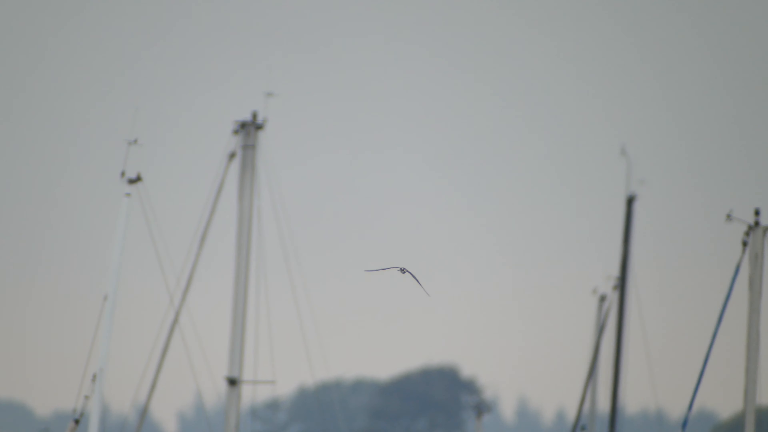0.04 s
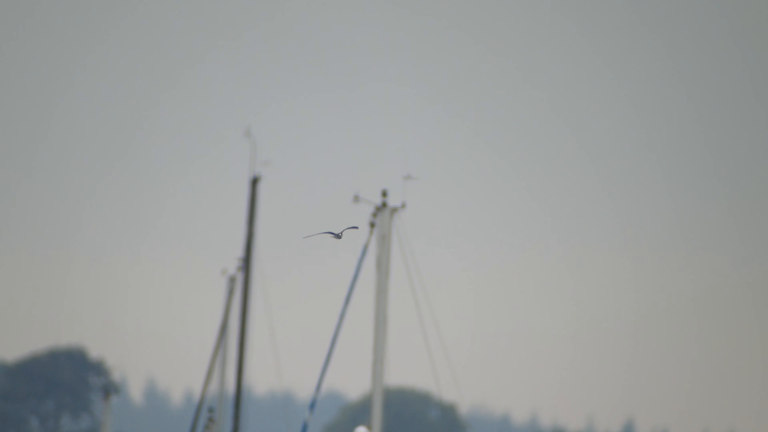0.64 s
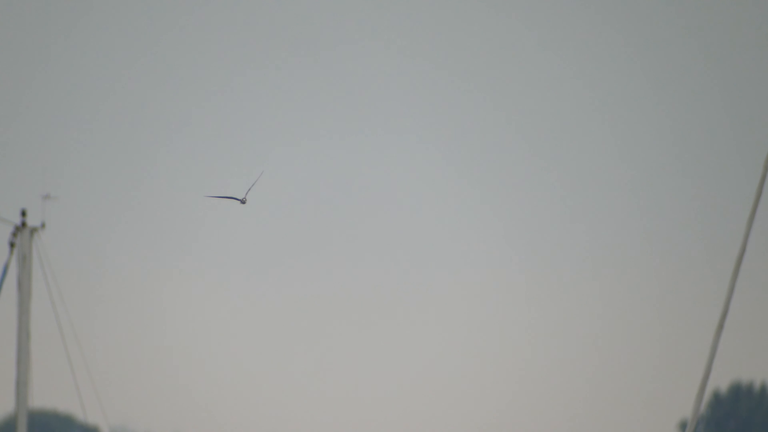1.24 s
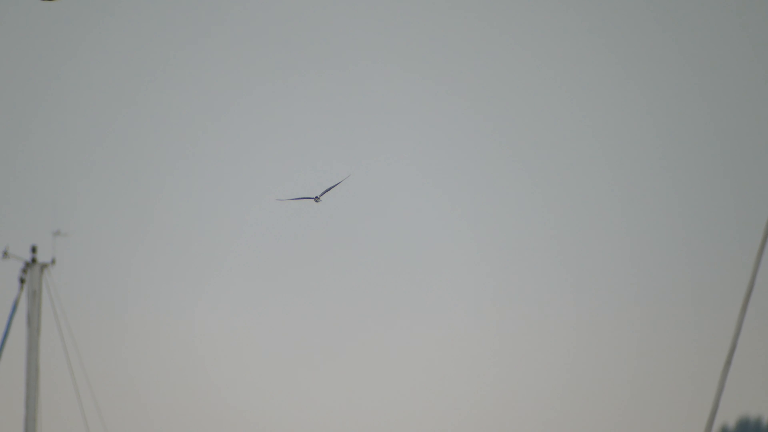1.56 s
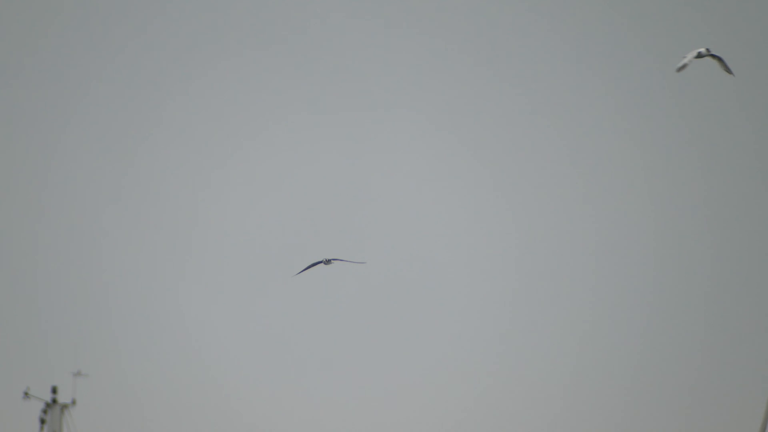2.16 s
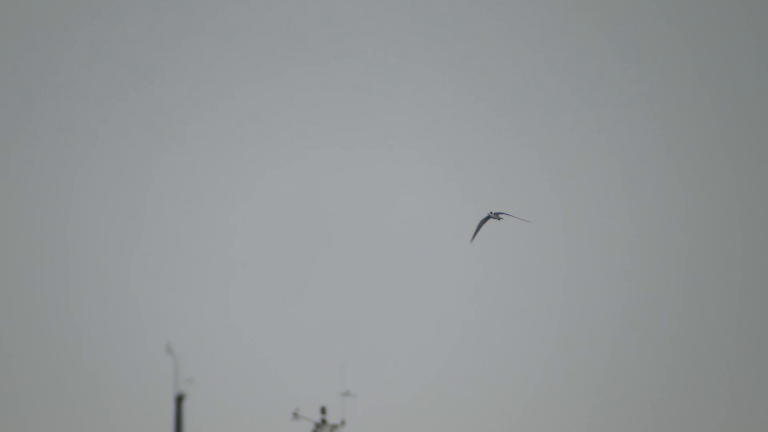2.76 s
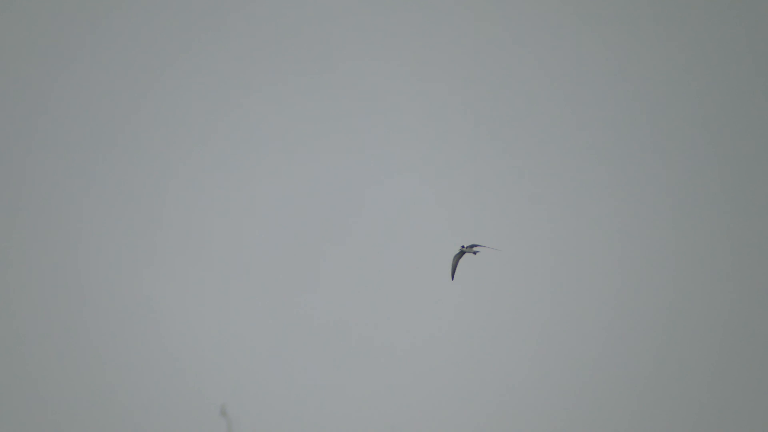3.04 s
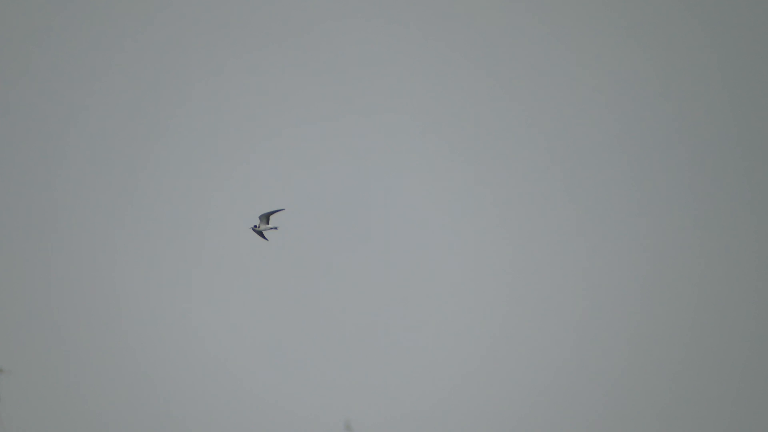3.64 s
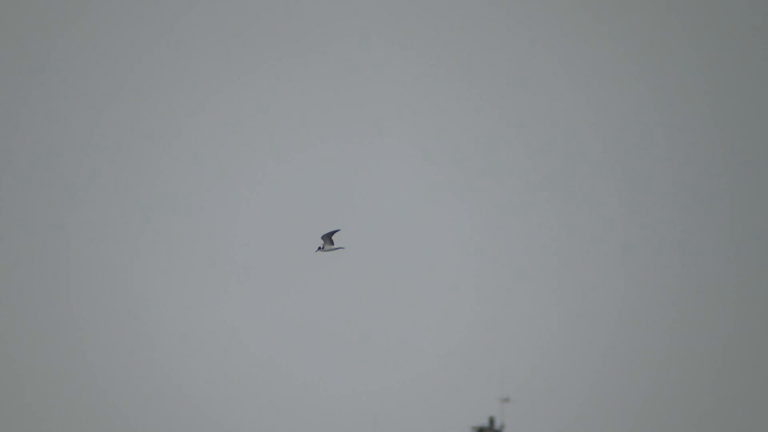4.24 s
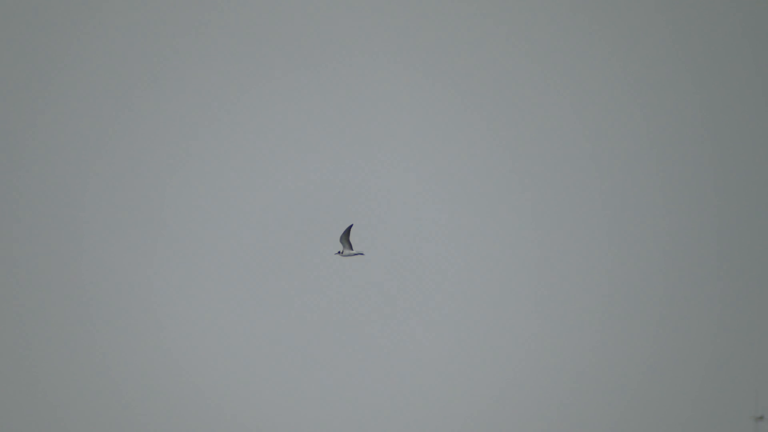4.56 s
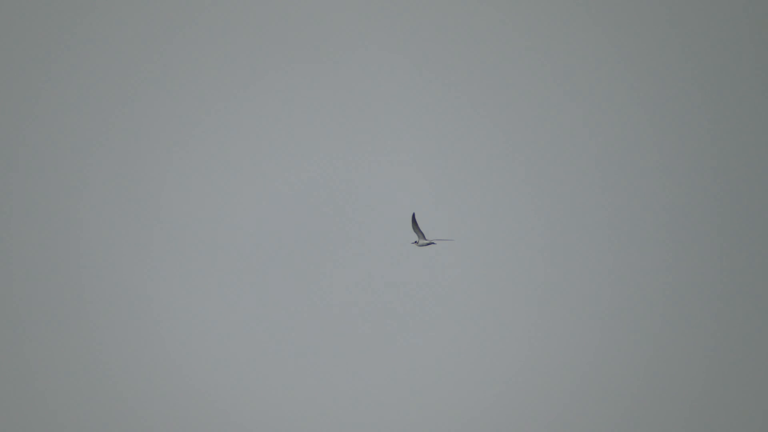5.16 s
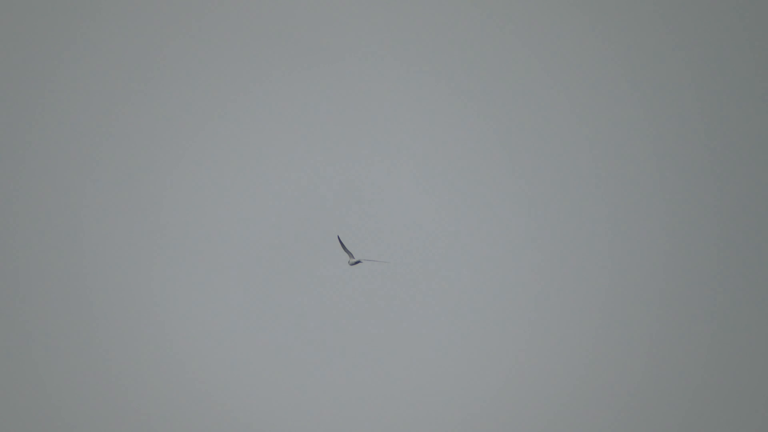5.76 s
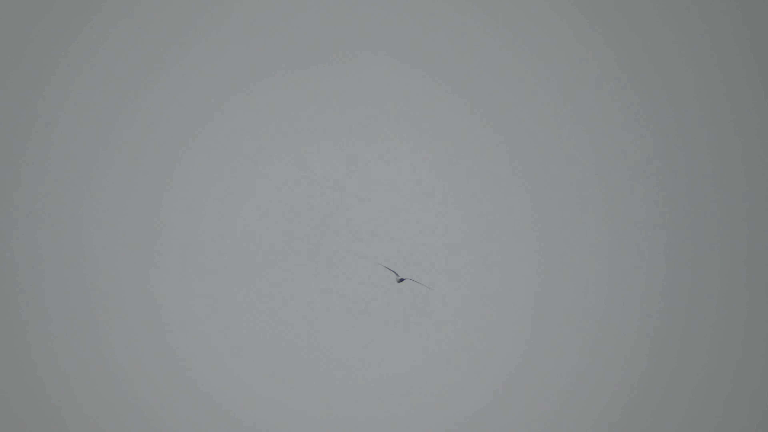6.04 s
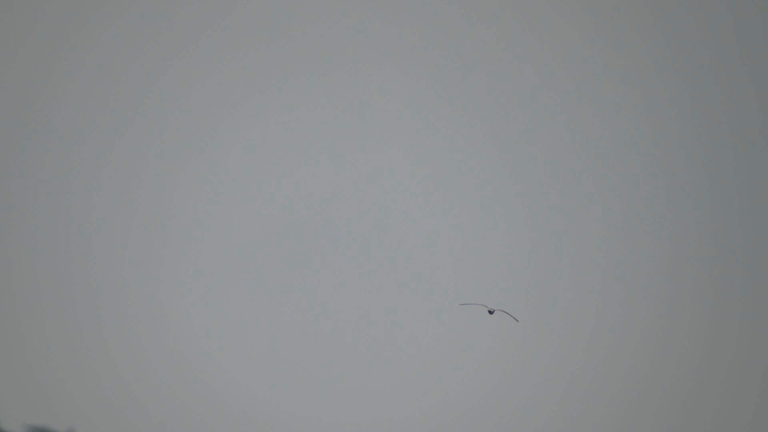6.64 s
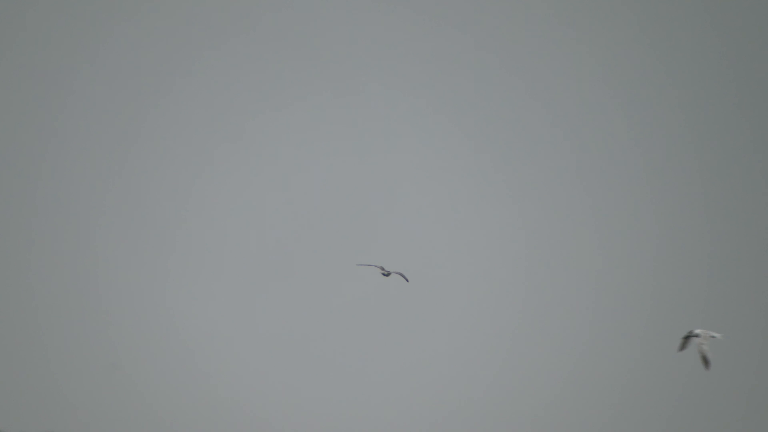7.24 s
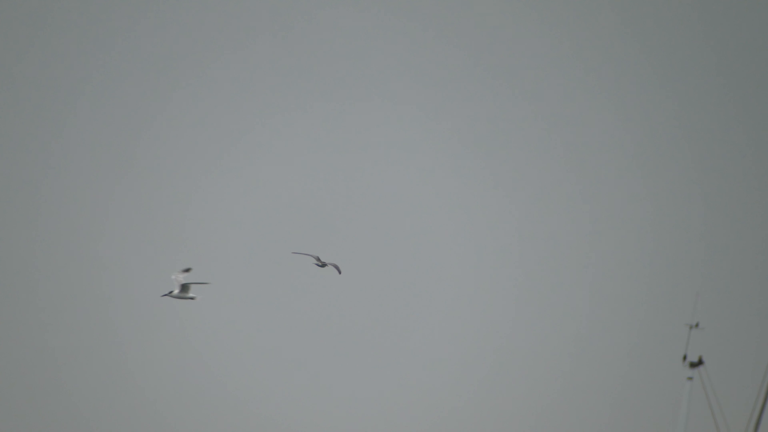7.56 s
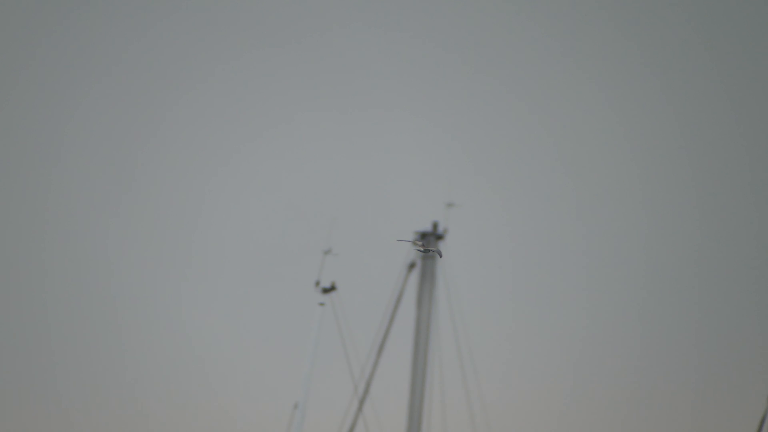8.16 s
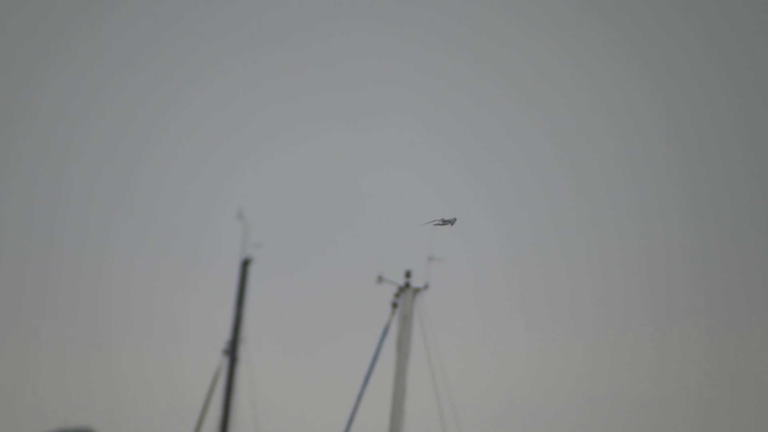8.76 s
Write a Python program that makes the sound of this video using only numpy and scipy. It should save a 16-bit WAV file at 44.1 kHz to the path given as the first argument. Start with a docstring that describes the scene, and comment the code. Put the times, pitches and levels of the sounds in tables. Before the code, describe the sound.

Close to the microphone and slightly left, terns give six rasping squawks, each breaking into a clear arched note, the last two fainter. High whistles and short chirps mix with farther hoarse calls and a faint colony, and carry on after the squawks stop. The calls echo lightly across a calm harbour, where water plops at the hulls over a low rumble.

```python
"""A reedy whistle wavers over the low rumble and engine hum of a quiet marina, where terns are wheeling.
Close to the microphone, a little left, they squawk: a pulsed rasp breaks into a clear arched note and
back. Thin warbles, pips and gritty squeaks overlap them; farther off come keks, rattles, hoarse notes
and a faint colony. Water washes softly and plops at the hulls, and the shore answers the birds."""
import sys
import numpy as np
from scipy import signal
from scipy.fft import rfft, irfft, next_fast_len
from scipy.io import wavfile
from scipy.ndimage import map_coordinates

SR = 44100
rng = np.random.default_rng(int(sys.argv[2]) if len(sys.argv) > 2 else 0)


def inscribe(sig):
    """Save sig as 16-bit PCM at rate SR to the path in sys.argv[1].

    A 1-D sig is mono; a 2-D sig holds one channel per row.
    Samples are clipped to [-1, 1] before scaling.
    """
    pcm = np.round(np.clip(np.atleast_2d(sig).T, -1, 1) * 32767)
    wavfile.write(sys.argv[1], SR, pcm.astype(np.int16))


N = 392490


def amp(db):
    """Decibels to gain."""
    return 10 ** (np.asarray(db) / 20)


def unit(x):
    """Scale to rms 1."""
    return x / np.sqrt(np.mean(x ** 2) + 1e-20)


def along(points, hz):
    """Read (f/Hz, value) points on a log frequency axis."""
    f, v = np.transpose(points)
    return np.interp(np.log(hz + 1), np.log(f + 1), v)


def curves(rows, at):
    """Interpolate the later columns of a table along its first."""
    axis, *columns = np.transpose(rows)
    return [np.interp(at, axis, column) for column in columns]


def wobble(rate, n):
    """A smooth random curve of n samples, rate knots a second."""
    return map_coordinates(rng.standard_normal(1024), [np.arange(n) * rate / SR], mode="wrap")


def filtered(x, response):
    """Filter x by a gain that is a function of frequency."""
    n = x.shape[-1]
    m = next_fast_len(n + SR // 10)
    return irfft(rfft(x, m) * response(np.fft.rfftfreq(m, 1 / SR)), m)[..., :n]


def band_rms(x, lo_hz, hi_hz):
    """Strength of x inside one band."""
    return np.std(filtered(x, lambda hz: (hz > lo_hz) & (hz < hi_hz))) + 1e-12


def clock(length):
    """Sample times of one call."""
    return np.arange(int(max(length, .01) * SR)) / SR


def turns(hz):
    """Running phase of a frequency curve, in radians."""
    return 2 * np.pi * np.cumsum(hz) / SR


def fade(t, rise, fall):
    """Soft start and end of a call."""
    return np.clip(t / rise, 0, 1) * np.clip((t[-1] - t) / fall, 0, 1)


def add(track, s, x):
    """Mix x into the track at time s."""
    part = track[max(int(s * SR), 0):][:len(x)]
    part += x[:len(part)]


def rush(spectrum):
    """Stereo noise of rms 1, reaching the microphone from all around."""
    # likeness of the two channels: f/Hz, left-right correlation
    correlation = [(40, 0.35), (120, 0.2), (200, 0.15), (300, -0.72), (550, -0.71), (1000, -0.35),
                   (2500, 0.39), (8000, 0.204)]

    def mid_side_gains(hz):
        angle = np.arccos(np.clip(along(correlation, hz), -1, 1)) / 2
        return amp(along(spectrum, hz)) * [np.cos(angle), np.sin(angle)]

    mid, side = filtered(rng.standard_normal((2, N)), mid_side_gains)
    return unit(np.array([mid + side, mid - side]))


def harbour_rumble():
    """Steady rumble from across the harbour, under open air that slowly swells and sinks."""
    # spectrum of rumble and air: f/Hz, relative density/dB
    spectrum = [(20, -41), (45, -18.5), (60, -22), (80, -6.5), (115, -7.5), (175, -6.5), (250, -5),
                (400, -7), (1000, -13.5), (1900, -20), (3300, -22), (4600, -19), (6200, -27.5), (9200, -29),
                (11500, -37), (15000, -43)]
    # swell of the open air: t/s, relative level/dB
    air_levels = [(0.0, -68), (2.87, -63), (4.19, -67.5), (6.72, -67), (7.68, -68.5), (8.9, -67.5)]
    air_db, = curves(air_levels, np.arange(N) / SR)
    noise = rush(spectrum)
    low = filtered(noise, lambda hz: 1 / (1 + (hz / 350) ** 4))
    high = noise - low
    rumble = amp(-60.5) * low / band_rms(low, 70, 326)
    air = amp(air_db + 4.5 + .18 * wobble(3.65, N)) * high / band_rms(high, 494, 1020)
    return rumble + air


def engine_hum():
    """Two low engine tones waver in strength and phase, separately in each channel."""
    def drone(hz, drift):
        phase = 2 * np.pi * hz * np.arange(N) / SR
        pair = [wobble(drift, N) * np.sin(phase) + wobble(drift, N) * np.cos(phase) for _ in range(2)]
        return unit(np.array(pair))

    return amp(-63) * drone(hz=198.5, drift=12) + amp(-64) * drone(hz=167.6, drift=24)


def wavers():
    """Reedy whistles whose pitch swings down and up."""
    # whistles: t/s, length/s, f/Hz, swing rate/Hz, level/dB
    calls = [(0.003, 0.15, 4550, 11, -47), (0.14, 0.1, 4750, 19, -51), (0.893, 0.115, 4560, 36, -48.5),
             (0.978, 0.077, 4510, 8.7, -46)]
    out = np.zeros(N)
    for start, length, hz, swing_hz, db in calls:
        t = clock(length)
        n = len(t)
        swing = .0318 * np.cos(2 * np.pi * swing_hz * t)
        phase = turns(hz * (1 - swing + .012 * wobble(110, n) + .026 * wobble(1400, n)))
        tone = unit(np.sin(phase) + amp(-19.5) * np.sin(2 * phase))
        add(out, start, amp(db + 2.6 * wobble(118, n)) * fade(t, .013, .015) * tone)
    return out


def shore(x):
    """Boats and shore scatter the calls back, mostly from ahead; the treble dies first."""
    # decay of the echo: f/Hz, time to fall 60 dB/s
    decay = [(500, 0.79), (2500, 0.42), (5000, 0.35), (10000, 0.077)]
    hz, t, noise = signal.stft(rng.standard_normal((2, SR)), SR, nperseg=256)
    mid, side = signal.istft(noise * amp(-60 * t / along(decay, hz)[:, None]), SR, nperseg=256)[1]
    tail = mid + amp(-1.5) * np.array([side, -side])
    return signal.fftconvolve(x[None], tail / np.linalg.norm(tail[0]), axes=1)[:, :N]


def hoarse(glide_hz, flutter):
    """A note on a pitch curve; flutter roughens the pitch and makes the level beat."""
    n = len(glide_hz)
    phase = turns(glide_hz * (1 + .07 * flutter * wobble(900, n)))
    beats = amp(6.7 * flutter * np.sin(turns(58 * (1 + .46 * wobble(66, n)))))
    tone = np.sin(phase) + amp(-19) * np.sin(2 * phase)
    return fade(np.arange(n) / SR, .028, .025) * unit(beats * tone)


def colony(count=44, registers_hz=(2446, 4840)):
    """Faint arched calls of many birds a long way off."""
    out = np.zeros(N)
    for i, (when, tune, span, size, flutter) in enumerate(rng.random((count, 5))):
        t = clock(.06 + .12 * span)
        glide_hz = registers_hz[i % 2] * (.84 + .2 * tune + .1 * np.sin(2.4 * t / t[-1]))
        call = amp(-68.5 + 8 * (size - .5)) * hoarse(glide_hz, .2 + .6 * flutter)
        add(out, (i + when) / count * N / SR, call)
    return out


def lapping(count=60):
    """Small bubbles plop faintly as ripples meet the hulls."""
    out, t = np.zeros((2, N)), clock(.11)
    for when, (tune, size, side) in zip(rng.uniform(0, N / SR, count), rng.standard_normal((count, 3))):
        rising_hz = 640 * np.exp(.2 * tune) * (1 + .5 * t)
        ring = np.sin(turns(rising_hz)) * np.exp(-t / .018) * fade(t, .008, .02)
        for channel, weight in zip(out, (np.cos(side), np.sin(side + 1))):
            add(channel, when, amp(-61 + 2 * size) * weight * ring)
    return out


def rasp(pitch, rough, beat_hz, depth_db):
    """A chaotic syrinx: harmonics of an unsteady pitch flicker, and all burst and chirp in quick beats."""
    n = len(pitch)
    cycle = turns(beat_hz * (1 + .24 * wobble(110, n))) - 2.4
    beat = np.tanh(1.5 * np.cos(cycle))
    jitter = .04 * rough * wobble(1100, n) + .018 * wobble(110, n)
    phase = turns(pitch * (1 + jitter + .035 * rough * np.sin(cycle)))
    tone = np.zeros(n)
    for k in range(1, 9):
        flicker = 1 + .85 * rough * (wobble(750, n) + 1j * wobble(750, n))
        swell_db = depth_db * beat * min(k / 3, 1) + 2.3 * wobble(110, n)  # upper harmonics beat deeper
        tone += np.real(flicker * np.exp(1j * (k * phase + k * k))) * amp(swell_db)
    breath = rng.standard_normal(SR)[:n] * amp(depth_db * beat)
    return unit(tone) + .3 * rough * unit(breath)


def throat_and_bill(voice, t, focus_hz, closing):
    """The wide-open bill stresses a high resonance, narrows to stress focus_hz, then closes."""
    # throat response, bill open: f/Hz, gain/dB
    open_throat = [(900, -16), (1350, 0.5), (2000, 3), (2700, 0.5), (3300, 7), (4000, 2.5), (4900, 6.5),
                   (5800, -1.5), (7000, -3.5), (8500, -8.5), (10000, -17), (12000, -39)]
    # throat response, bill closing: f/Hz, gain/dB
    closing_throat = [(900, -34), (1300, -1), (2000, 6), (2550, 1), (3100, 5.5), (3800, 9.5), (4500, -1.5),
                      (5200, 2), (5900, 1), (6600, 0), (8000, -8.5), (10000, -10), (12000, -47)]

    def stressed(centre_hz, db):
        peak_db = lambda hz: db * np.exp(-((hz - centre_hz) / 480) ** 2)
        return unit(filtered(voice, lambda hz: amp(along(open_throat, hz) + peak_db(hz))))

    gape = np.exp(-(t / .066) ** 2)
    open_voice = gape * stressed(4160, db=9) + (1 - gape) * stressed(focus_hz, db=6.5)
    closing_voice = filtered(voice, lambda hz: amp(along(closing_throat, hz)))
    return (1 - closing) * unit(open_voice) + closing * unit(closing_voice)


def clear_note(from_crest, crest_hz, note_db, octave_db):
    """The arched note in a squawk starts on its fundamental; the octave swells on the way down."""
    n = len(from_crest)
    arch = .85 + .15 * np.exp(-(from_crest / np.where(from_crest < 0, .05, .04)) ** 2)
    phase = turns(crest_hz * arch * (1 + .017 * wobble(900, n) + .008 * wobble(150, n)))
    fundamental = amp(note_db) * np.exp(-((from_crest + .016) / .063) ** 6) * np.sin(phase)
    swell = np.exp(-((from_crest - .022) / .021) ** 2) + .5 * np.exp(-((from_crest + .0027) / .085) ** 4)
    overtones = np.sin(2 * phase) + amp(-11.5) * np.sin(3 * phase) + amp(-25.5) * np.sin(4 * phase)
    return np.sqrt(2) * (fundamental + amp(octave_db) * swell * overtones) * amp(2 * wobble(170, n))


def squawks(lead_in_s=.19, near_db=-47):
    """A rasp scoops up, tires, yields to a clear note and returns; gives the calls and the shore's feed."""
    # squawks: start t/s, crest t/s, crest f/Hz, rasp f/Hz, opening level/dB, closing level/dB,
    # closing length/s, brightness/dB, lead-in level/dB, note level/dB, octave level/dB,
    # stressed resonance f/Hz, roughness/0-1, beat depth/dB
    calls = [(0.237, 0.509, 2554, 1351, -45, -45, 0.11, 1, -68, -50.5, -40, 4460, 0.68, 3),
             (1.319, 1.597, 2641, 1379, -43, -45, 0.16, 1.5, -50, -39, -40, 3780, 0.47, -1.5),
             (2.36, 2.639, 2566, 1346, -41, -43.5, 0.16, -0.5, -56, -40.5, -38, 4260, 0.69, 4.5),
             (3.468, 3.765, 2594, 1387, -44.5, -46.5, 0.16, -4, -56, -42.5, -44.5, 2600, 0.69, 5),
             (4.966, 5.241, 2516, 1279, -54, -53, 0.11, -3, -58.5, -49.5, -55.5, 2690, 0.61, -1),
             (6.381, 6.649, 2500, 1297, -49.5, -56, 0.14, -11.5, -48.5, -49.5, -45, 3700, 0.66, 7)]
    out, to_shore = np.zeros((2, N))
    for (start, crest, crest_hz, rasp_hz, open_db, close_db, closing_s, bright_db,
         lead_db, note_db, octave_db, focus_hz, roughness, beat_db) in calls:
        t = clock(crest + closing_s - start)
        from_crest = start + t - crest
        after = np.maximum(from_crest, 0)  # as the bill shuts, pitch and treble sink
        closing = np.clip(from_crest / .0377, 0, 1)
        opening_db = open_db - 14 * np.exp(-t / .0076) - 19.5 * t  # bursts out, then tires
        yield_db = 9 * np.exp(-((from_crest + .015) / .04) ** 2)
        level_db = (1 - closing) * opening_db + closing * close_db - yield_db
        scoop = 1 + .24 * np.exp(-t / .035) - .31 * np.exp(-t / .012)
        pitch = (1 - closing) * rasp_hz * scoop + closing * 1304 * (1 - .118 * after)
        rough = roughness + .25 * np.exp(-t / .07) + .08 * closing
        beat_hz = 76 + 6 * np.exp(-t / .08) + 8 * closing
        depth_db = beat_db + 8 * np.exp(-t / .022) + 24 * after  # the first beats stand apart
        voice = throat_and_bill(rasp(pitch, rough, beat_hz, depth_db), t, focus_hz, closing)
        high = filtered(voice, lambda hz: 1 - 1 / (1 + (hz / 5500) ** 16))
        low = voice - high
        body = amp(1.5) * low / band_rms(low, 2930, 5630)
        treble_db = bright_db - 5.5 - 7 * np.exp(-t / .004) - 60 * after
        treble = amp(treble_db) * high / band_rms(high, 5500, 6930)
        note = clear_note(from_crest, crest_hz, note_db, octave_db)
        call = fade(t, .004, .055) * (amp(level_db) * (body + treble) + note)
        lead_hz = np.full(len(clock(lead_in_s)), .91 * crest_hz)
        add(call, crest - lead_in_s - start, amp(lead_db) * hoarse(lead_hz, flutter=.97))
        add(out, start, call)
        echo_db = -5 + .3 * (near_db - open_db)  # fainter birds are farther off and wetter
        add(to_shore, start, amp(echo_db) * call)
    return out, to_shore


def whistles():
    """A nearly pure tone slides up, warbles unevenly in upward flicks, holds and drops away."""
    # whistles: t/s, length/s, f/Hz, relative level/dB
    calls = [(0.494, 0.13, 4470, -51.5), (0.643, 0.15, 4565, -55.5), (0.738, 0.12, 4593, -51.5),
             (1.677, 0.19, 4440, -45), (1.883, 0.17, 4883, -55), (2.129, 0.19, 4435, -46.5),
             (2.185, 0.18, 4870, -56), (2.884, 0.19, 4460, -49.5), (3.341, .19, 4584, -47),
             (3.743, 0.11, 4650, -55), (3.965, 0.13, 4630, -54), (4.195, 0.12, 4577, -52),
             (3.17, 0.15, 4875, -66.5), (5.785, 0.13, 4746, -58.5), (6.001, 0.14, 4820, -52),
             (6.895, .168, 5157, -54), (7.323, 0.19, 5103, -53.5), (7.732, 0.18, 5080, -54)]
    # shape by pitch: f/Hz, late swell/dB, octave level/dB
    shapes = [(4400, 0.5, -21.5), (4790, 5.5, -13), (4990, 3.5, -30)]
    # width of the warble: f/Hz, share of pitch
    warbles = [(4420, .045), (4560, .09), (4750, .14), (4880, .17), (5100, .135)]
    # final fall: f/Hz, share of pitch
    drops = [(4450, .02), (4750, .05), (4900, .13), (5100, .15)]
    out = np.zeros(N)
    for start, length, hz, db in calls:
        t = clock(length)
        progress, n = t / t[-1], len(t)
        swell_db, octave_db = curves(shapes, hz)
        # low whistles start to warble later and shake less regularly
        begins = np.interp(hz, [4500, 4900], [.28, .06])
        uneven = np.interp(hz, [4500, 4900], [.35, .1])
        warbling = np.interp(progress, [begins - .04, begins + .1, .55, .63], [0, 1, 1, 0])
        width = warbling * along(warbles, hz) * min(length / .12, 1) ** 2
        cycle = turns(48 * (1 + uneven * wobble(60, n)))
        flick = np.abs(np.sin(cycle / 2)) ** 3 * (1 + uneven * wobble(50, n))
        shake = width * (flick - .17)
        rise = 1 - .085 * np.exp(-t / .018) + .008 * np.exp(-((progress - .28) / .17) ** 2)
        drop = along(drops, hz) * np.exp((t - t[-1]) / .014)
        wander = .02 * uneven * (wobble(40, n) + wobble(200, n))
        grit = (.001 + .02 * uneven + .4 * uneven * width) * wobble(1400, n)
        phase = turns(hz * (rise - drop + shake + wander + grit))
        level_db = db + swell_db * np.interp(progress, [.55, .66], [-.4, .6]) - 4 * progress ** 14
        level_db += 1.95 * wobble(130.6, n) - 40 * shake  # thins at the top of each shake
        octave = amp(octave_db + 1.17 * wobble(37.3, n)) * np.sin(2 * phase)
        tone = np.sin(phase) + octave + amp(-58) * np.sin(3 * phase)
        tremor = unit(filtered(rng.standard_normal(SR)[:n], lambda f: 1 / (1 + (f / 2300) ** 4)))
        call = 3.64 * amp(level_db) * tone * (1 + amp(-18) * warbling * tremor) * fade(t, .005, .006)
        add(out, start, call)
        # a glancing echo off the water beats against the moving pitch
        add(out, start + rng.uniform(.004, .014), .33 * call)
    return out


def keks():
    """Short, slightly falling rasps from birds farther off."""
    # keks: t/s, length/s, f/Hz, relative level/dB
    calls = [(0.885, 0.094, 1590, -60), (1.193, 0.079, 1617, -59.5), (4.407, 0.063, 1560, -67),
             (4.425, 0.13, 1337, -58.5), (4.835, 0.063, 1483, -58), (6.327, 0.074, 1585, -56),
             (7.209, 0.096, 1583, -54.5)]
    # throat response: f/Hz, gain/dB
    throat = [(900, -22), (1500, -3.5), (2300, -3), (3100, -2), (4600, -2.5), (6500, -16), (9000, -28.5),
              (12000, -55)]
    out = np.zeros(N)
    for start, length, hz, db in calls:
        t = clock(length)
        voice = rasp(hz * (1.02 - .054 * t / t[-1]), rough=.5, beat_hz=78, depth_db=6)
        voice = filtered(voice, lambda f: amp(along(throat, f)))
        add(out, start, amp(db) * fade(t, .0042, .026) * unit(voice))
    return out


def rattles(beat_hz=66.6, rise=.14):
    """In the distance, separate dry beats fuse into a clear rising note."""
    # rattles: start t/s, note t/s, crest t/s, crest f/Hz, relative rattle and note levels/dB
    calls = [(.93, 1.035, 1.1, 2580, -63, -57), (4.104, 4.135, 4.185, 2640, -63, -60),
             (7.29, 7.4, 7.46, 2500, -58, -51), (7.92, 8.012, 8.062, 2590, -59, -53),
             (8.3, 8.38, 8.47, 2840, -61, -57)]
    out = np.zeros(N)
    for start, opens, crest, hz, rattle_db, note_db in calls:
        t = clock(crest + .045 - start)
        n, now = len(t), start + t
        clear = np.clip((now - opens) / .0044, 0, 1)
        cycle = turns(beat_hz * (1 + .2 * wobble(60, n)))
        beats = unit(np.sin(cycle / 2) ** 10 * amp(2.5 * wobble(70, n)))
        sinking = 1 - rise + .8 * (opens - now) + .035 * wobble(900, n)
        below_crest = np.sin(np.pi / 2 * (now - crest) / (crest - opens)) ** 2
        rising = 1 - rise * below_crest + .026 * wobble(700, n)
        phase = turns(hz * ((1 - clear) * sinking + clear * rising))
        tone = np.sin(phase) + amp(-5.5) * np.exp(-((now - crest) / .036) ** 2) * np.sin(2 * phase)
        level = (1 - clear) * amp(rattle_db) * beats + clear * amp(note_db + 2 * wobble(138, n))
        add(out, start, np.sqrt(2) * fade(t, .004, .052) * tone * level)
    return out


def pips():
    """Short contact calls, each one small arch of pitch, loudest at its crest."""
    # pips: t/s, length/s, crest f/Hz, crest level/dB
    calls = [(1.492, 0.081, 4376, -37), (3.604, 0.048, 4580, -42.5), (3.048, 0.057, 4780, -46),
             (6.872, 0.047, 4653, -48), (7.088, 0.052, 4470, -51.5), (7.176, 0.068, 4520, -46.5),
             (8.067, 0.064, 4620, -44.5), (8.18, 0.044, 4620, -50.5), (8.254, 0.083, 4600, -45),
             (8.423, 0.04, 4590, -44.5), (8.509, 0.077, 4590, -43.5)]
    out = np.zeros(N)
    for start, length, hz, db in calls:
        t = clock(length)
        n = len(t)
        off_crest = (t / t[-1] / .606 - 1) ** 2
        phase = turns(hz * (1 - .0378 * off_crest + .01 * wobble(300, n) + .01 * wobble(1400, n)))
        tone = unit(np.sin(phase) + amp(-20) * np.sin(2 * phase))
        level_db = db - 12.5 * off_crest + 3.8 * wobble(119, n)
        add(out, start, amp(level_db) * fade(t, .006, .005) * tone)
    return out


def washes():
    """Water rushes softly around the microphone in a few brief swells."""
    # washes: t/s, length/s, level/dB
    swells = [(2.7, 0.13, -53.5), (5.408, 0.23, -51), (6.355, 0.28, -50.5), (6.737, 0.066, -49)]
    # spectrum of the water: f/Hz, relative density/dB
    spectrum = [(250, -23), (500, -10), (850, -4), (1600, -15), (3000, -17), (6000, -20), (9000, -23),
                (12000, -53)]
    t = np.arange(N) / SR
    level = sum(amp(db) * np.exp(-(2 * (t - start) / length - 1) ** 4) for start, length, db in swells)
    return level * unit(rush(spectrum) * amp(1.8 * wobble(70, N)))


def far_notes():
    """Hoarse, fluttering notes of other birds glide from one pitch to another."""
    # notes: t/s, length/s, first f/Hz, last f/Hz, relative level/dB, flutter (about 0-1)
    calls = [(3.462, 0.073, 2910, 2923, -42.5, 0.16), (4.423, 0.092, 5000, 5290, -54, 0.83),
             (4.405, 0.13, 1500, 1380, -57.5, 1.02), (4.549, 0.074, 2070, 2305, -61, 0.3),
             (5.598, 0.26, 1164, 1113, -66.5, 0.73), (6.715, 0.096, 5200, 4890, -52, 0.2),
             (6.8, 0.075, 1290, 1442, -54, 1.02), (7.3, 0.14, 630, 612, -67.5, 0.07),
             (7.515, 0.244, 3010, 2880, -73.5, 0.28), (7.85, 0.057, 2680, 2840, -54.5, 0.54),
             (8.2, 0.084, 5360, 5170, -62.5, 0.45), (8.713, 0.27, 2450, 2970, -65, 0.6)]
    out = np.zeros(N)
    for start, length, first_hz, last_hz, db, flutter in calls:
        t = clock(length)
        glide_hz = first_hz + (last_hz - first_hz) * np.sin(np.pi / 2 * t / t[-1])
        add(out, start, amp(db) * hoarse(glide_hz, flutter))
    return out


def chatters():
    """Strings of short, gritty squeaks, each an upward flick."""
    # strings: t/s, length/s, f/Hz, squeak rate/Hz, level/dB, relative octave level/dB
    calls = [(5.335, 0.24, 4420, 112, -56, -6), (6.39, 0.07, 3950, 88, -51, -20),
             (6.412, 0.045, 5100, 88, -50.5, -20), (6.708, 0.058, 4350, 83, -45.5, -26),
             (6.81, 0.08, 5100, 86, -51, -16)]
    out = np.zeros(N)
    for start, length, hz, rate, db, octave_db in calls:
        t = clock(length)
        n = len(t)
        cycle = turns(rate * (1 + .2 * wobble(90, n)))
        phase = turns(hz * (1 - .02 * np.sin(cycle) + .045 * wobble(1500, n)))
        pulses = (.25 + np.sin(cycle / 2) ** 4) * amp(2 * wobble(90, n))
        tone = np.sin(phase) + amp(octave_db) * np.sin(2 * phase)
        add(out, start, amp(db) * fade(t, .004, .006) * unit(pulses * tone))
    return out


def scene():
    """The birds fly a little left of the microphone; far ones are wetter, the colony is all echo."""
    harsh, harsh_to_shore = squawks()
    thin = whistles() + wavers() + pips() + chatters()
    far = rattles() + keks() + far_notes()
    left = np.array([[.5], [-.5]])  # splits a level difference between the channels
    drift_db = wobble(4.9, N)
    direct = harsh * amp(2 * left) + thin * amp((3.5 + drift_db) * left) + far * amp(left + 3.4)
    echo = shore(harsh_to_shore + amp(-10) * thin + amp(-3) * far + colony())
    return direct + echo + harbour_rumble() + engine_hum() + washes() + lapping()


def record(dry):
    """The microphone chain passes nothing above 15.2 kHz."""
    return filtered(dry, lambda hz: hz < 15200)


dry = scene()
out = record(dry)
inscribe(out)
```